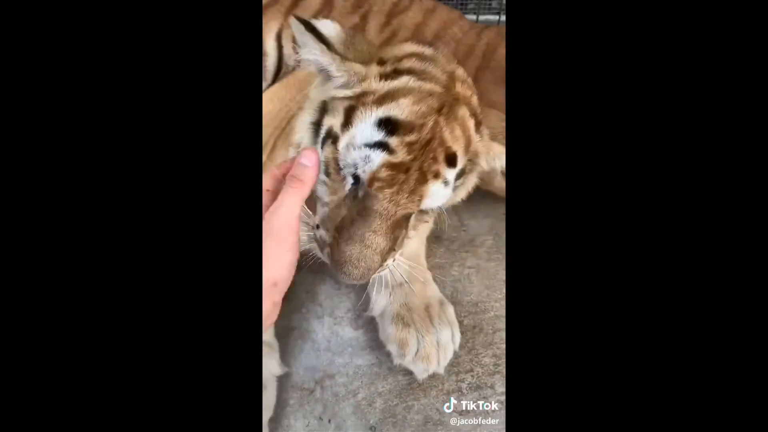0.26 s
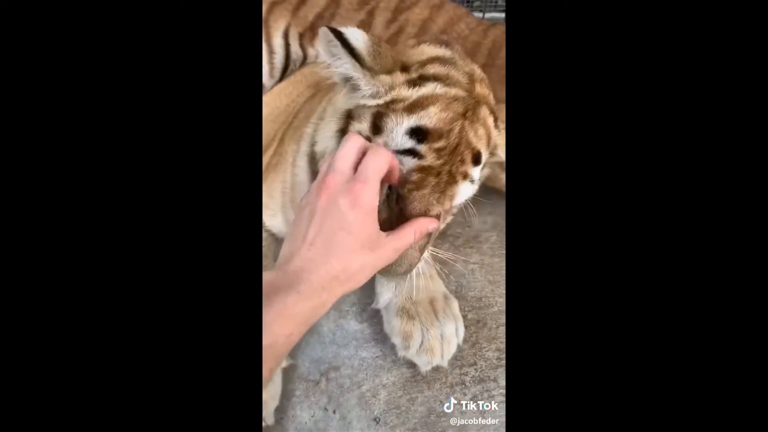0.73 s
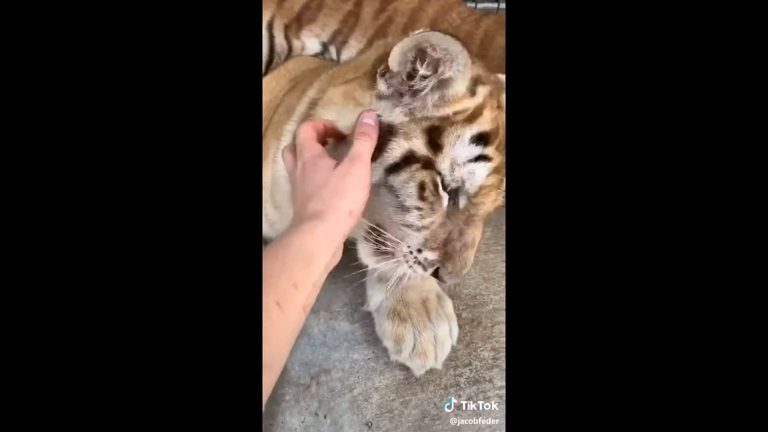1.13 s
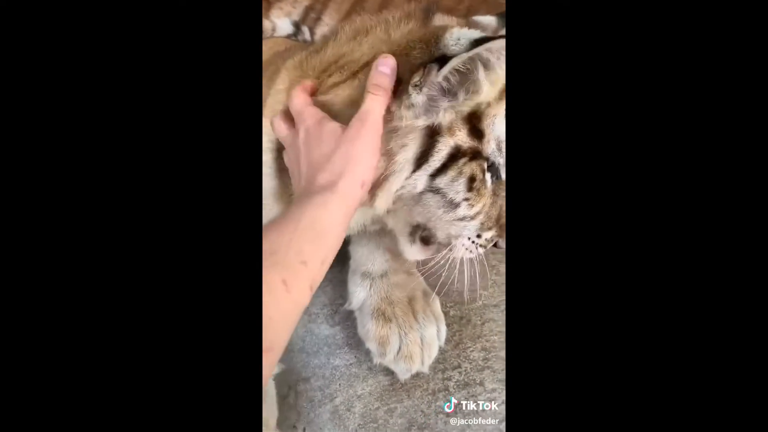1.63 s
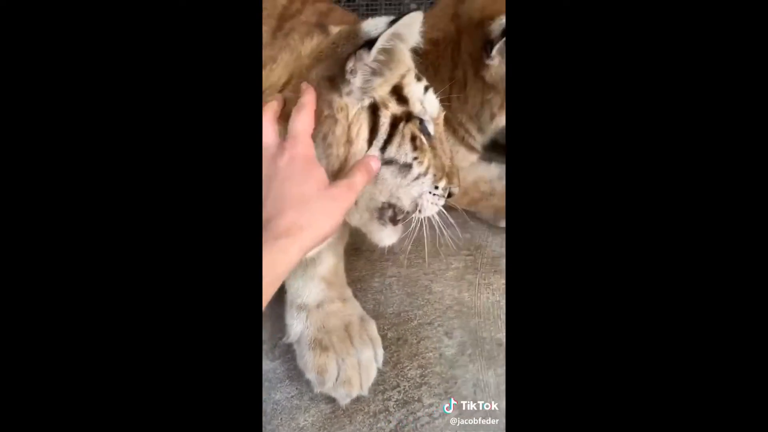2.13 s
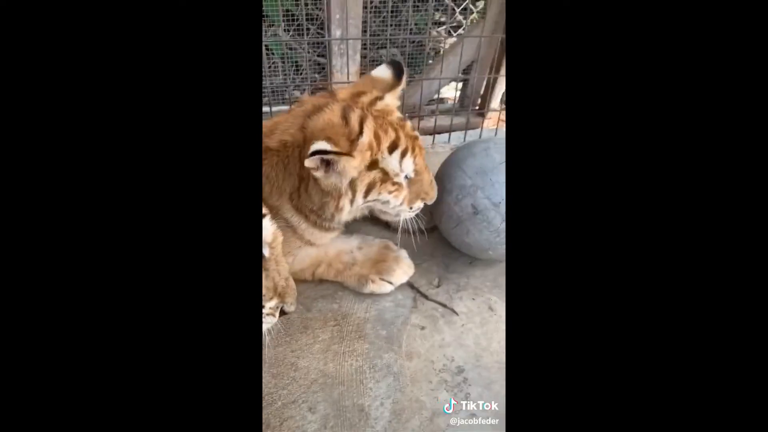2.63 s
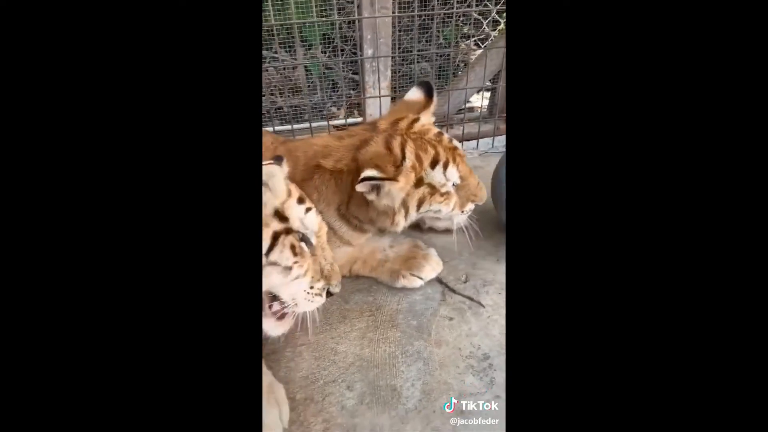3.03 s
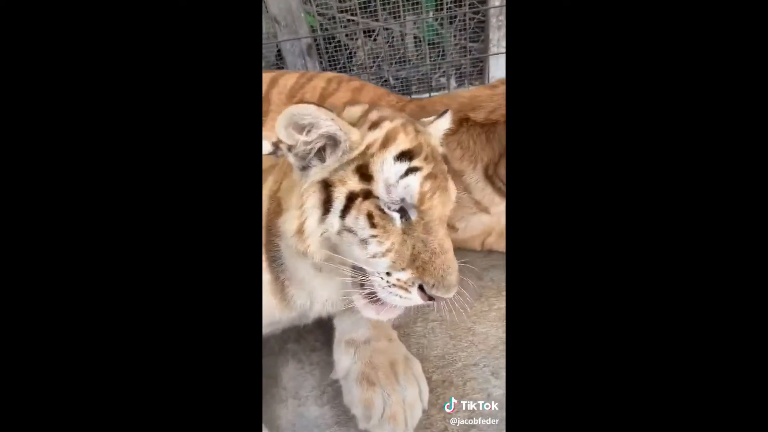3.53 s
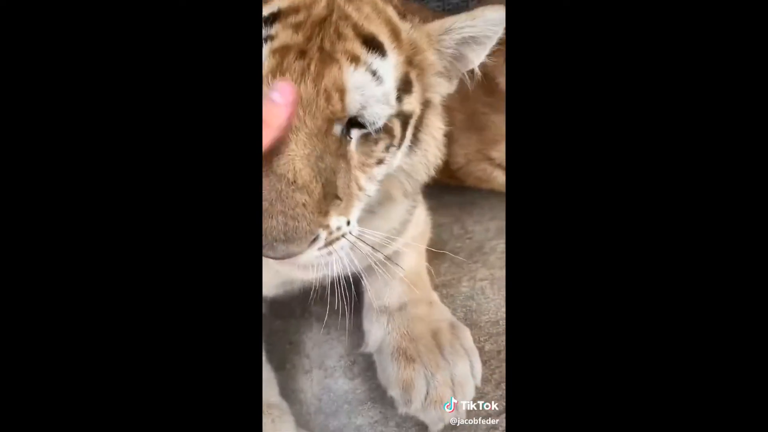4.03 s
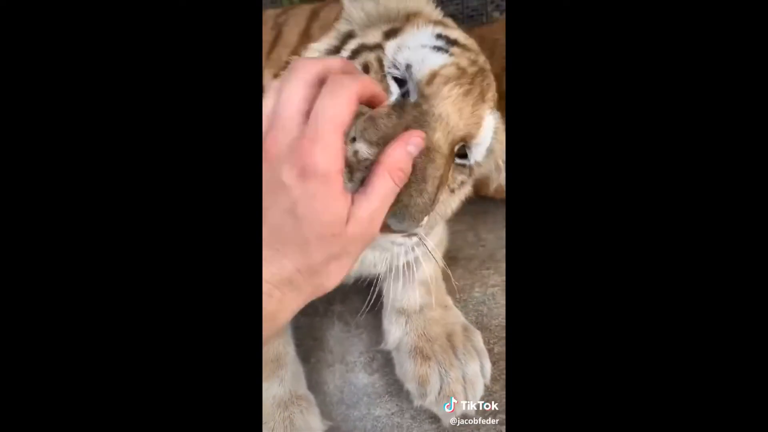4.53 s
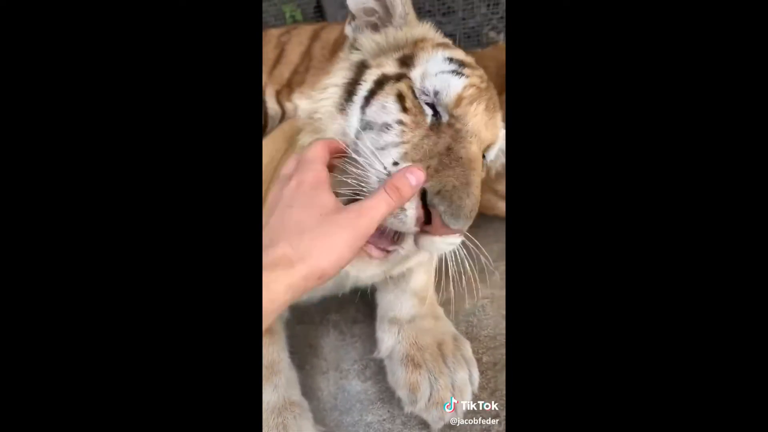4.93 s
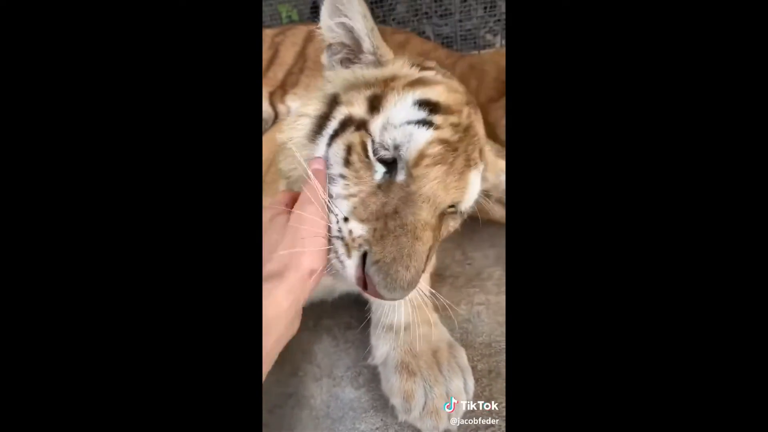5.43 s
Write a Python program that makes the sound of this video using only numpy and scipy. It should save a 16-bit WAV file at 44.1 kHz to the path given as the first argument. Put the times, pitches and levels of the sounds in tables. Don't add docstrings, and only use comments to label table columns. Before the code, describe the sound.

Close, dry, clacking growls from a young tiger come in two spells, separated by a quiet stretch of soft bumps and faint nose puffs.

```python
import sys
import numpy as np
from scipy import signal
from scipy.fft import rfft, irfft, next_fast_len
from scipy.io import wavfile
from scipy.ndimage import uniform_filter1d

SR = 44100
rng = np.random.default_rng(int(sys.argv[2]) if len(sys.argv) > 2 else 0)


def makeup_ratio(level_db):
    decades = np.asarray(level_db, float) / 20
    return 10 ** decades


def log_audio(samples):
    frames = np.atleast_2d(samples).T
    limited = np.clip(frames, -1, 1)
    pcm = np.round(limited * 32767).astype(np.int16)
    wavfile.write(sys.argv[1], SR, pcm)


N = 249988

# (time [s], flow level [dB], mouth opening [0-1])
AIR = [(0, -36.5, 0), (.45, -34, 0.65), (1.04, -38.5, 0.34), (1.1, -54.5, 0.93), (1.24, -47.5, 0.9),
       (1.37, -63.5, 1), (1.47, -43.5, 0), (1.81, -31.5, 0.47), (2.05, -37, 0), (2.35, -42, 0.79),
       (2.5, -61, 0.85), (3.27, -61.5, 1), (4.009, -57.5, 0.87), (4.2, -23, 0.58), (4.38, -40, 0.67),
       (4.6, -56, 0.86), (5.12, -41, 0), (5.4, -55, 0.9)]
# (frequency [Hz], width [Hz], level [dB])
THROAT = [(1217, 73, 1), (1530, 56, 0.5), (1759, 66, 2), (1946, 50, -4.5), (2385, 710, -14.5),
          (640, 820, -19.5)]
# (frequency [Hz], width [Hz], level [dB])
CHEST = [(120, 51, 4), (181.7, 13.6, 6.5), (217.4, 53, -14.5), (345, 104, -8.5), (384.5, 80, -8)]
# (frequency [Hz], level [dB])
MOUTH = [(2300, -35), (2900, -2.5), (3800, 1), (5000, -2), (7000, -2.5), (9000, -9), (11000, -13.5),
         (13100, -17.5), (13500, -48), (14300, -56)]
# (frequency [Hz], likeness [0-1])
SAME = [(60, .995), (300, .97), (800, .6), (1200, .88), (1700, .9), (2400, .3), (4000, .3), (5200, .6),
        (6200, .5), (7500, .95), (9200, .9), (10000, .4), (12000, .66)]
# (time [s], rate [flaps/s])
PACE = [
    [(.0074, 27.42), (.185, 30.36), (.301, 41.06), (.393, 38.42), (.465, 25.29), (.619, 20.59),
     (.845, 44.6)],
    [(.8879, 25), (.97, 31), (1.055, 35)],
    [(2.222, 24.5), (2.332, 53), (2.38, 30)],
]


def evened(x):
    return x / np.sqrt(np.mean(x ** 2) + 1e-20)


def peaked(x):
    return x / (abs(x).max() + 1e-12)


def smoothed(x, rows, columns):
    return uniform_filter1d(uniform_filter1d(x, rows, axis=-2), columns, axis=-1)


def read(points, hz):
    f, value = np.transpose(points)
    return np.interp(np.log(hz + 1), np.log(f + 1), value)


def add(mix, s, sound):
    part = mix[max(round(s * SR), 0):][:len(sound)]
    part += sound[:len(part)]


def resonate(x, hz, width):
    r = np.exp(-np.pi * width / SR)
    return 2 * signal.lfilter([1 - r], [1, -r * np.exp(2j * np.pi * hz / SR)], x).real


def cavity(x, modes, stretch=1, widen=1):
    total = 0
    for k, (hz, width, db) in enumerate(modes):
        hz, width = hz * stretch, width * widen
        total = total + (-1) ** k * makeup_ratio(db) * resonate(resonate(x, hz, width), hz, 3 * width)
    return total


def through_mouth(x):
    size = next_fast_len(len(x))
    gain = makeup_ratio(read(MOUTH, np.fft.rfftfreq(size, 1 / SR)))
    return irfft(rfft(x, size) * gain, size)[:len(x)]


def puff(t, start, rise, fall):
    u = np.maximum(t - start, 0)
    return (1 - np.exp(-u / rise)) * np.exp(-u / fall)


def hum():
    # (frequency [Hz], spectral density [dB per Hz])
    density = [(15, -48), (28, -4), (70, -10.5), (125, -4.5), (200, -17.5), (384, -27.5), (600, -29),
               (1000, -32), (2000, -35.5), (4000, -41), (7000, -40.5), (10000, -41.5), (12800, -44.5),
               (13500, -86)]
    frames, hz = N // 256 + 5, np.fft.rfftfreq(1024, 1 / SR)
    a, b, c, d, patches = rng.standard_normal((frames, 513, 5)).T
    patches = evened(smoothed(patches, 10, 12))
    same, left = np.clip(read(SAME, hz), -1, 1)[:, None], a + 1j * b
    right = same * left + np.sqrt(1 - same ** 2) * (c + 1j * d)
    z = np.array([left, right]) * makeup_ratio(read(density, hz)[:, None] + 0.83 * patches)
    return makeup_ratio(-41.5) * evened(signal.istft(z, nperseg=1024, noverlap=768)[1][:, :N])


def pen(x):
    # (frequency [Hz], decay time to -60 dB [s])
    decay = [(120, 0.44), (300, 0.3), (1200, 0.18), (2500, 0.1), (8000, 0.14)]
    taps = np.zeros((2, SR // 2))
    at = np.arange(200, SR // 2 - 20, 20)
    at = at + rng.integers(0, 20, (2, len(at)))
    np.put_along_axis(taps, at, rng.choice([-1., 1.], at.shape), 1)
    hz, t, z = signal.stft(taps, SR, nperseg=256)
    tail = signal.istft(z * makeup_ratio(-60 * t / read(decay, hz)[:, None]), SR, nperseg=256)[1]
    tail = tail + 1.04 * tail[::-1]
    return signal.fftconvolve(x[None], tail / np.linalg.norm(tail[0]), axes=1)[:, :N]


def ports(x):
    # (frequency [Hz], phase lead of the left [rad])
    lead = [(300, -.25), (800, .5), (1150, 1.3), (1700, .4), (2400, 1.2), (4000, 1.6), (5200, 3.1),
            (6500, 5.5), (7200, 6.2), (9300, 6.3), (10000, 7.8), (10700, 9.1), (11400, 9.4)]
    # (frequency [Hz], left minus right [dB])
    tilt = [(60, -.3), (500, -1), (1100, -5), (1700, -3), (2500, -.5), (5000, 0)]
    hz, _, z = signal.stft(x, SR, nperseg=512, noverlap=384)
    scatter = evened(smoothed(rng.standard_normal(z.shape[1:]), 5, 24))
    phase = read(lead, hz)[:, None] + 1.8 * np.sqrt(1 - read(SAME, hz))[:, None] * scatter
    half = makeup_ratio(read(tilt, hz) / 2)[:, None] * np.exp(.5j * phase)
    return signal.istft(z * [half, 1 / half], SR, nperseg=512, noverlap=384)[1][:, :N]


def touches():
    # (time [s], peak level [dB], body
    # relative to it [dB])
    ticks = [(0.1556, -29.5, 6.5), (0.2417, -15.5, -19), (0.3279, -20, 1), (0.4106, -25, 5),
             (1.0168, -28, -1), (1.207, -20.5, -2.5), (1.2769, -27.5, -5.5), (1.522, -22.5, -15),
             (1.702, -25.5, -17), (1.928, -13, -1), (1.974, -17, -2.5), (2.2609, -17.5, -4),
             (2.349, -24.5, -11), (2.4185, -34, -19.5), (2.6418, -35.5, -8.5), (3.254, -33.5, -7.5),
             (4.1355, -19.5, -1), (4.1862, -30.5, 18), (4.4592, -19, -12), (4.481, -50, 26),
             (4.5156, -22.5, -3), (4.6397, -28, -6), (4.711, -34, -9), (4.9586, -17.5, -4),
             (5.1121, -14.5, -6), (5.216, -14, -6.5), (5.3818, -21.5, -3.5), (5.5364, -21, -9),
             (5.6283, -25, -0.5), (5.6438, -34, 8)]
    # (time [s], peak level [dB], frequency [Hz])
    bumps = [
        (2.924, -35, 325),
        (3.298, -27, 292),
        (3.383, -33, 354),
        (3.499, -26, 264),
        (3.68, -28, 253),
        (4.495, -20.5, 400),
    ]
    out, t = np.zeros(N), np.arange(4096) / SR
    for s, db, body_db in ticks:
        hz = 7700 * (1 + 0.2 * rng.standard_normal())
        burst = rng.standard_normal(len(t)) * (puff(t, 0, 0.0004, 0.0018) + 0.3 * puff(t, 0, 0.003, 0.009))
        bright = through_mouth(burst) + 3.3 * resonate(burst, hz, 2250)
        body = peaked(cavity(burst, THROAT, widen=4.0))
        add(out, s - .001, makeup_ratio(db) * (1.14 * peaked(bright) + 1.32 * makeup_ratio(body_db) * body))
    for s, db, hz in bumps:
        burst = rng.standard_normal(len(t)) * puff(t, 0, 0.0017, 0.0086)
        add(out, s, 0.63 * makeup_ratio(db) * peaked(resonate(burst, hz, 240)))
    return out


def thuds():
    # (time [s], peak level [dB], frequency [Hz], width [Hz])
    blows = [
        (1.131, -10, 120, 600),
        (4.028, -20, 133, 59),
        (4.052, -16, 148, 40),
        (4.1, -19.5, 137.6, 40),
    ]
    out, t = np.zeros(N), np.arange(8192) / SR
    push = np.diff(puff(t, 0, 0.00022, 0.0042), prepend=0)
    for s, db, hz, width in blows:
        add(out, s, makeup_ratio(db) * peaked(resonate(push, hz, width / 3)))
    return out


def huffs():
    # (middle [s], length [s], level [dB], frequency [Hz])
    puffs = [
        (2.9, .08, -51.5, 1210),
        (3.201, 0.071, -50, 1520),
        (3.333, 0.14, -46, 1130),
        (3.741, 0.15, -42.5, 1046),
        (3.932, 0.036, -53, 1950),
        (4.682, 0.068, -40.5, 613),
    ]
    out = np.zeros(N)
    for s, length, db, hz in puffs:
        noise = rng.standard_normal(8192)[:round(length * SR)]
        nose = cavity(noise, [(hz, 120, 0), (hz * 1.53, 300, -8), (2000, 250, -7), (340, 80, -1)])
        add(out, s - length / 2, makeup_ratio(db) * evened(nose) * np.hanning(len(noise)))
    return out


def squeak():
    # (time [s], pitch [Hz], level [dB])
    glide = [(4.085, 345, -38), (4.109, 363, -42), (4.138, 390, -30.5), (4.17, 410, -36), (4.2, 397.4, -30),
             (4.23, 384, -45), (4.251, 353, -49), (4.27, 325, -48)]
    s, hz, db = np.transpose(glide)
    t = np.arange(s[0], s[-1], 1 / SR)
    waver = 1 + 0.011 * evened(uniform_filter1d(rng.standard_normal(len(t)), 300))
    turns = np.cumsum(np.interp(t, s, hz) * waver) / SR
    harmonics_db = [3, -3, -6, -7, -9]
    tone = sum(makeup_ratio(d) * np.sin(2 * np.pi * (k + 1) * turns) for k, d in enumerate(harmonics_db))
    out = np.zeros(N)
    add(out, s[0], tone * makeup_ratio(np.interp(t, s, db)) * signal.windows.tukey(len(t), .3))
    return out


def turning(pace):
    s, rate = np.transpose(pace)
    t = np.arange(s[0], s[-1], 1 / SR)
    return t, np.cumsum(np.interp(t, s, rate)) / SR


def choke():
    db = np.zeros(N)
    for pace in PACE:
        t, turns = turning(pace)
        add(db, t[0], -6 * (turns % 1))
    return makeup_ratio(uniform_filter1d(db, size=100))


def air():
    s, *controls = np.transpose(AIR)
    flow_db, opening = (np.interp(np.arange(N) / SR, s, c) for c in controls)
    shut_db, open_db = -24.5, 4
    hiss = makeup_ratio(flow_db + shut_db + (open_db - shut_db) * np.clip(opening, 0, 1))
    rumble = makeup_ratio(-12 + .55 * flow_db)
    noise = rng.standard_normal((4, N))
    lumps = makeup_ratio(2.2 * evened(resonate(noise[3], 25, 50)))
    throat = makeup_ratio(flow_db) * evened(cavity(noise[0] * lumps, THROAT))
    chest = rumble * evened(cavity(noise[1] * lumps, CHEST))
    mouth = hiss * evened(through_mouth(noise[2] * lumps))
    return choke() * (throat + chest + mouth)


def flap(db, low_hz, high_hz, lead_db, rebound_db, chest_late_s, chest_db, click_db, rebound_s,
         leak_db, hum_db, snap_s, leak_s, size):
    t = np.arange(size) / SR - .02
    noise, (late, glide) = rng.standard_normal((3, len(t))), rng.uniform(0.7356, 1.188, 2)
    lead = makeup_ratio(lead_db) * np.exp(-abs(t) / 0.0043) * (t < 0) * 1.97
    rebound = makeup_ratio(rebound_db) * puff(t, rebound_s, 0.0025, 0.0033)
    leak = makeup_ratio(leak_db) * puff(t, 0.0014, 0.003, leak_s)
    first = puff(t, 0, 0.00029, snap_s)
    second = 1.45 * puff(t, 0.0036 * late, 0.0011, snap_s) - 0.39 * puff(t, .0075 * late, 0.00025, snap_s)

    rings = [(low_hz, 110, 2.5), (high_hz, 160, -1), (430, 250, -15)]
    upper = [(2070 * glide ** 0.41, 250, -4), (2450, 400, -14)]
    slaps = 14 * np.diff(first - second, prepend=0) / snap_s * 0.00065 + 0.19 * noise[0] * (first + second)
    throat = peaked(cavity(slaps, rings) + cavity(slaps * np.exp(-np.maximum(t, 0) / 0.015), upper))

    faint = [(hz, width, level - 9) for hz, width, level in upper] + [(1670, 200, -8.5)]
    tail = [(low_hz, 140, 5), (high_hz, 210, -3), (480, 300, -14)] + faint
    throat = throat + makeup_ratio(rebound_db) * peaked(cavity(noise[0] * rebound, tail, widen=.4))
    flow = noise[0] * (lead + leak)
    narrow = cavity(flow, tail, widen=0.13) + 0.4 * cavity(flow, tail, widen=0.42)
    throat = throat + narrow / np.std(cavity(noise[0], rings, widen=0.77)) * 0.42

    u = np.maximum(t - chest_late_s, 0)
    turns = glide ** .5 * (150 * u + 150 * 0.008 * (1 - np.exp(-u / 0.0058)))
    push = puff(u, 0, 0.0017, 0.0027) + makeup_ratio(hum_db) * puff(u, 0, 0.0019, leak_s)
    stir = noise[1] * (first + 0.27 * rebound + 3 * leak)
    thump = peaked(np.sin(2 * np.pi * turns) * push) + 0.27 * peaked(cavity(stir, CHEST, glide ** 0.17))

    click = through_mouth(noise[2] * (first + 0.3 * second + 0.3 * lead + .25 * rebound + 0.35 * leak))
    return 1.274 * makeup_ratio(db) * throat + 0.99 * makeup_ratio(chest_db) * thump + 3.43 * makeup_ratio(click_db) * peaked(click)


def rattle(pace):
    # (time [s], throat peak level [dB], chest thump level [dB])
    effort = [(0, -14.5, -11.5), (.12, -17, -22), (.23, -35, -29), (.34, -19, -27.5), (.46, -16, -22),
              (.59, -13.5, -17), (.83, -28.5, -24.5), (0.891, -14.5, -14.5), (1.05, -28, -26.5),
              (2.22, -11.5, -25), (2.27, -24.5, -16.5), (2.38, -31, -28.5)]
    t, turns = turning(pace)
    s, throat_db, chest_db = np.transpose(effort)
    for at in np.interp(np.arange(0, turns[-1]), turns, t):
        a, b, c, d = rng.standard_normal(size=4)
        db = np.interp(at, s, throat_db) + 1.5 * a
        yield at, flap(db, low_hz=1210 * (1 + .03 * b), high_hz=1542 * (1 + .03 * c), lead_db=-3,
                       rebound_db=-16, chest_late_s=0.0026, chest_db=np.interp(at, s, chest_db),
                       click_db=db - 27 + 3 * d, rebound_s=0.0149, leak_db=-18.5, hum_db=-17,
                       snap_s=0.0018, leak_s=0.038, size=4096)


def knock(s, db, low_hz, rebound_db, click_db):
    flow_db = np.interp(s - .02, *np.transpose(AIR)[:2])
    return flap(db, low_hz, high_hz=1573 * (1 + 0.015 * rng.standard_normal()),
                lead_db=-13 + 0.41 * (flow_db + 41.5), rebound_db=rebound_db, chest_late_s=0.0024,
                chest_db=-6.5 + 0.39 * db, click_db=click_db, rebound_s=.0145, leak_db=-18, hum_db=-22.5,
                snap_s=0.0021, leak_s=0.048, size=9000)


def growl():
    # (time [s], throat peak [dB], lower ring [Hz], rebound relative to it [dB], mouth click [dB])
    knocks = [(1.1304, -28, 1138, 5, -28.5), (1.4095, -4, 1187, -8.5, -15), (1.593, -3, 1695, -12, -14.5),
              (1.765, 1.5, 1218, -7.5, -18), (1.9073, -4, 1270, -8.5, -13.5),
              (2.0074, -1, 1277, -16.5, -20), (2.0869, -7, 1210, -20, -28.5), (2.139, -7, 1210, -35, -21),
              (2.1879, -8, 1176, -25, -36), (4.0258, -11, 1256, -13, -31),
              (4.7739, 1.5, 1219, -13.5, -16.5), (4.9257, -1, 1217, -9, -14.5),
              (5.0636, -3.5, 1266, -8, -14.5), (5.191, 0.5, 1280, -26, -21), (5.3074, -0.5, 1322, -19, -29),
              (5.4106, 0.5, 1270, -13.5, -16), (5.5117, -3.5, 1210, -18, -29.5),
              (5.5961, -1.5, 1265, -24.5, -22)]
    out = np.zeros(N + SR)
    early = 1 - .02
    for pace in PACE:
        for at, sound in rattle(pace):
            add(out, at + early, sound)
    for s, *settings in knocks:
        add(out, s + early, knock(s, *settings))
    return out[SR:]


def scene():
    cat = growl() + air() + touches()
    cat = cat - .7 * resonate(cat, 916, 234)
    cat = cat - 0.47 * resonate(cat, 72, 29)
    near = cat + squeak() + thuds() + huffs()
    return ports(near + makeup_ratio(-12) * pen(near) + hum())


def band_limit(x):
    return signal.sosfilt(signal.butter(12, 14280, fs=SR, output="sos"), x)


def record(dry):
    mix = 0.95 * np.tanh(dry / 1.153)
    return band_limit(mix)


dry = scene()
out = record(dry)
log_audio(out)
```